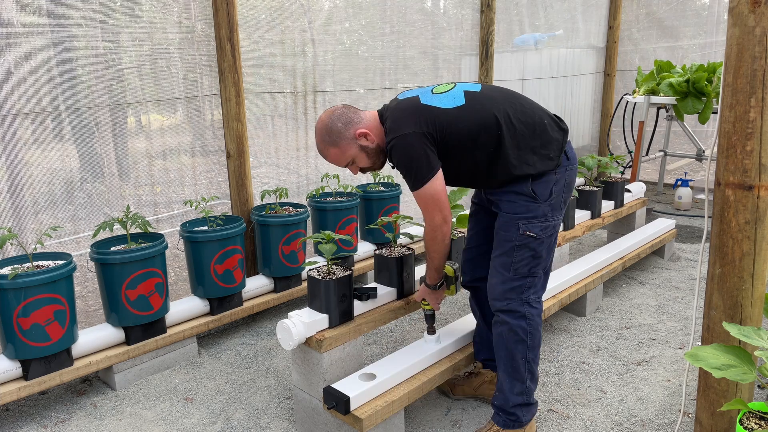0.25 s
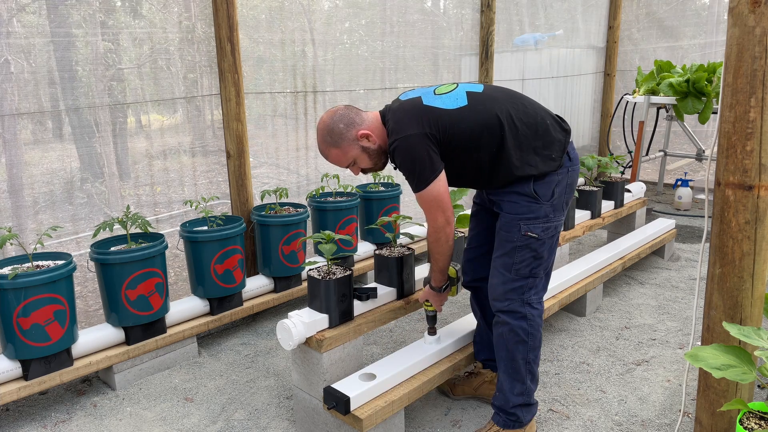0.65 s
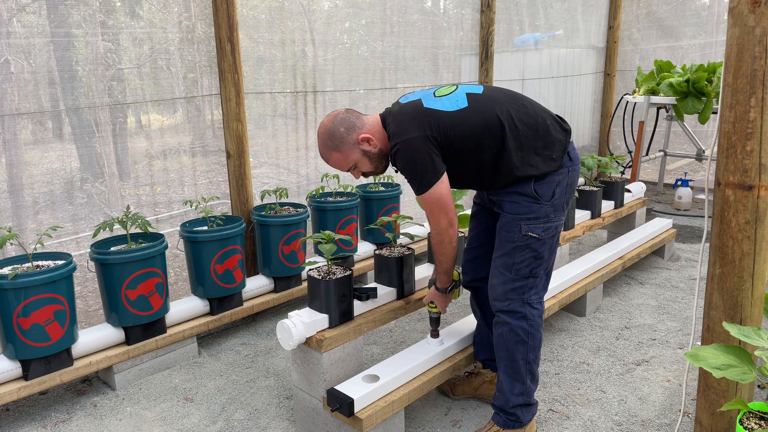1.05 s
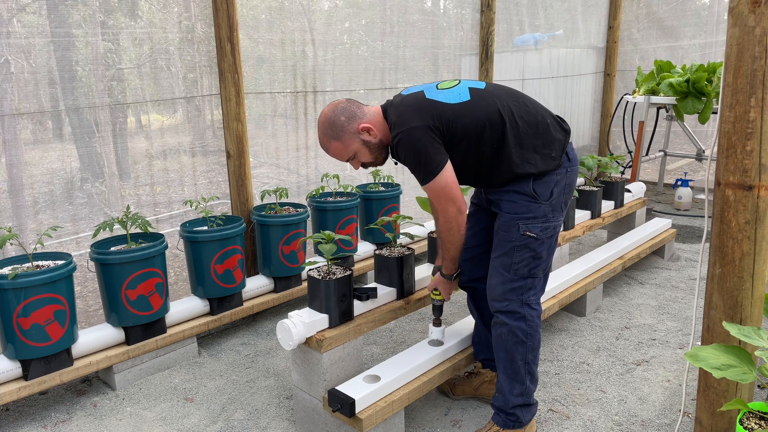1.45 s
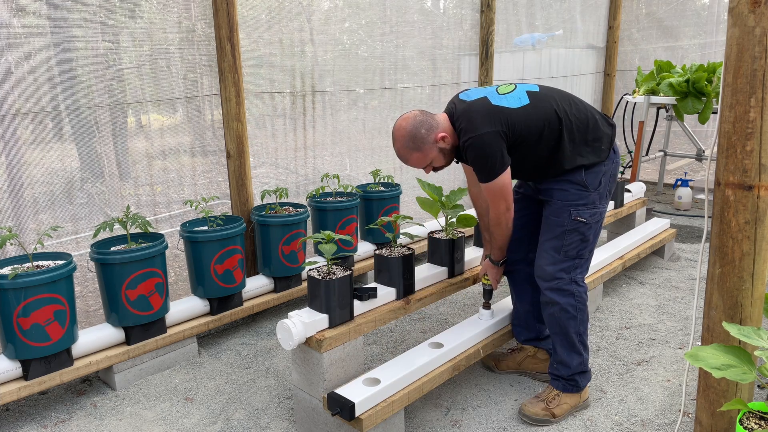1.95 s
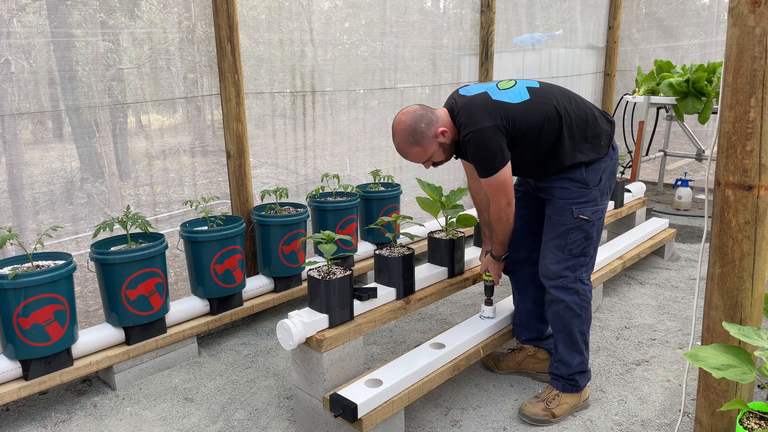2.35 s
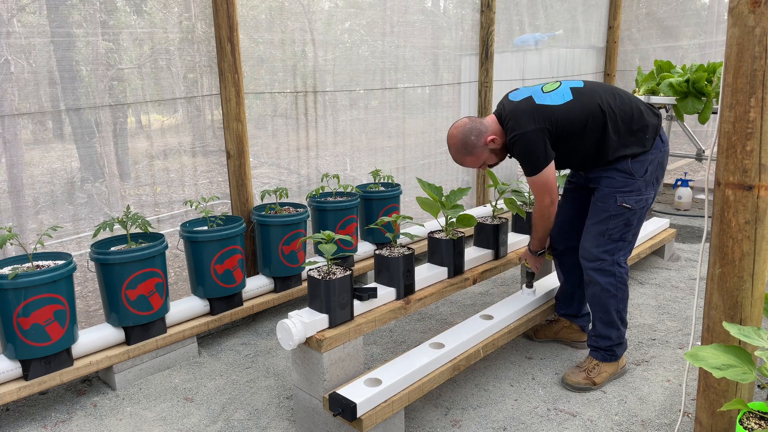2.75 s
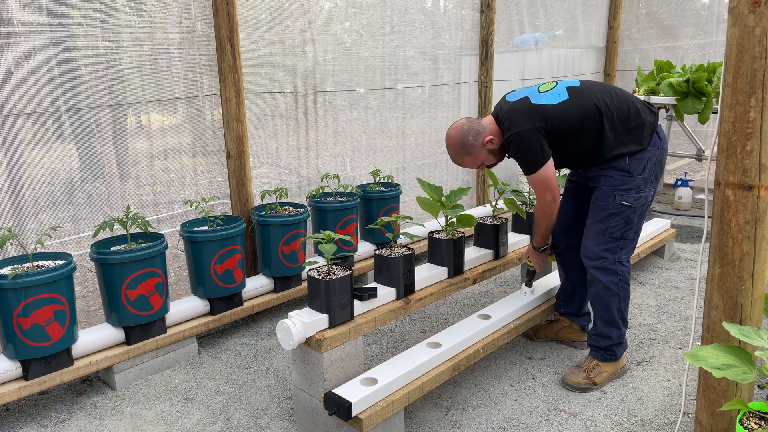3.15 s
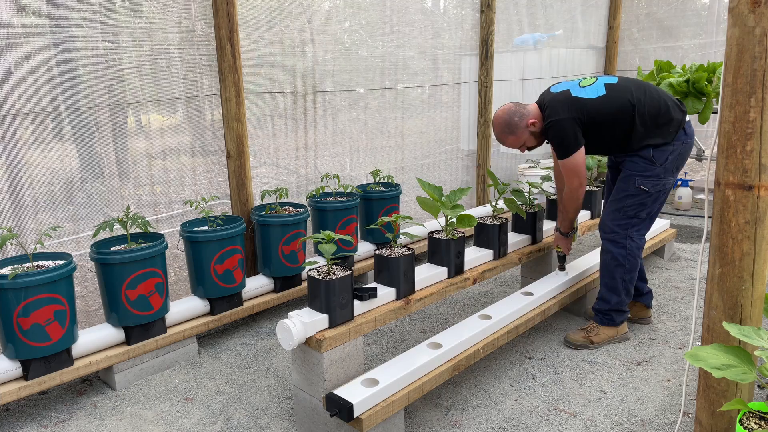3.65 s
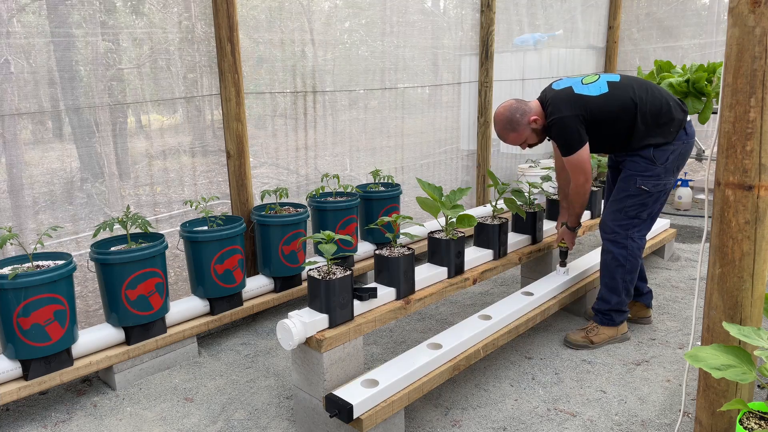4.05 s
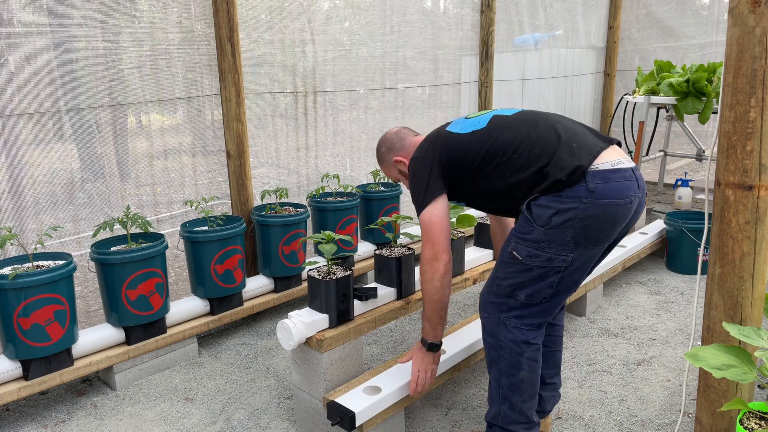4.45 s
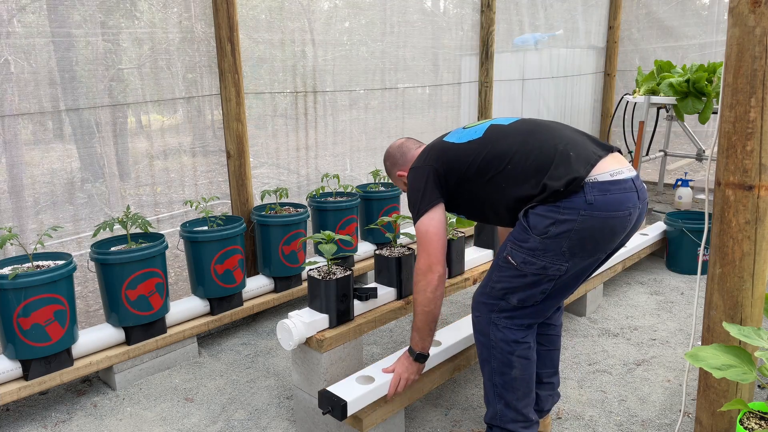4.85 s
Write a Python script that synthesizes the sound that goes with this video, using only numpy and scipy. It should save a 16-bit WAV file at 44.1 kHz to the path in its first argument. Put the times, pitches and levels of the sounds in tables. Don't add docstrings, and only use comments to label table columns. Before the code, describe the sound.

Four abruptly cut bursts of whirring drill and rattling plastic pipe, each spinning free and clacking to a stop, then quiet handling and faint birds.

```python
import sys
import numpy as np
from scipy import signal
from scipy.fft import rfft, irfft, next_fast_len
from scipy.io import wavfile
from scipy.ndimage import map_coordinates

SR = 44100
rng = np.random.default_rng(int(sys.argv[2]) if len(sys.argv) > 2 else 0)


def pcm_store(signal):
    levels = np.round(np.clip(np.atleast_2d(signal), -1, 1) * 32767)
    wavfile.write(sys.argv[1], SR, levels.astype(np.int16).T)


def level_to_linear(level):
    exponent = np.asarray(level, float) / 20
    return 10 ** exponent


N = 225351
TIME = np.arange(N) / SR

# start_s of each take, then the end
TAKES = [
    0,
    .1495,
    1.6155,
    2.5155,
    3.349,
    4.1155,
    5.2,
]
# through_s (saw breaks through), off_s (trigger let go), brake_s (brake bites)
RUNS = [
    (.878, 1.092, 1.402),
    (1.964, 2.142, 2.288),
    (2.82, 3.008, 3.128),
    (3.545, 3.708, 3.915),
]
# regular_share (0-1), wobble_phase_turns, wobble_on_pipe_db, wobble_on_grit_db
HOLES = [
    (0.52, 0.75, 3, 4),
    (0.74, 0.14, 0.5, -0.5),
    (0.83, 0.45, 1, 0.5),
    (0.53, 0.58, -0.5, 1),
]
# loaded_mesh_db, its side_tones_db, commutator_db, load_effect_on_commutator_db
TONES = [
    (-52, -9, -42, 3.5),
    (-36.5, -16, -45.5, 1),
    (-32, -11, -41, -3),
    (-34.5, -14, -39, 5),
]
# pitch_hz, width_hz
PIPE = [(135, 50), (213, 14), (268, 35), (333, 20), (375, 35), (470, 35), (540, 40), (610, 30), (700, 45),
        (775, 50), (915, 50), (1010, 70), (1200, 90), (1420, 120), (1740, 90)]
SAW_GEAR = 14.33
UNLOAD_S = .01
SURGE_DB, SURGE_RISE = 3.5, 20.6
LET_GO, STOP = 1800, 990


def unit(x):
    return x / np.sqrt(np.mean(x ** 2) + 1e-20)


def along(points, hz):
    f, v = np.transpose(points)
    return np.interp(np.log(hz + 1), np.log(f + 1), v)


def wobble(rate):
    step = 16
    knots = rng.standard_normal(int(N * rate / SR) + 4)
    return np.repeat(map_coordinates(knots, [TIME[::step] * rate]), step)[:N]


def filtered(x, response):
    m = next_fast_len(len(x) + SR // 4)
    return irfft(rfft(x, m) * response(np.fft.rfftfreq(m, 1 / SR)), m)[:len(x)]


def noise(spectrum, grain_db):
    grains = rng.standard_normal(N) * level_to_linear(grain_db * wobble(700))
    return unit(filtered(grains, lambda hz: level_to_linear(along(spectrum, hz))))


def stroke(t, s, held_s, rise, fall):
    before = np.clip(s - t, 0, .5)
    after = np.clip(t - s - abs(held_s), 0, .5)
    return level_to_linear(-abs(rise) * before - abs(fall) * after)


def dying(t, db, hz, t60):
    return level_to_linear(db - 60 * t / t60) * np.sin(2 * np.pi * hz * t)


def shed(x):
    # pitch_hz, t60_s
    echo_t60 = [
        (200, 0.18),
        (2000, 0.29),
        (12000, 0.12),
    ]
    hz, t, z = signal.stft(rng.standard_normal(SR // 2), SR, nperseg=256)
    tail = signal.istft(z * level_to_linear(-60 * t / along(echo_t60, hz)[:, None]), SR, nperseg=256)[1]
    tail = tail / np.linalg.norm(tail)
    cuts = [min(round(s * SR), N) for s in TAKES]
    return np.concatenate([signal.fftconvolve(x[a:b], tail)[:b - a] for a, b in zip(cuts, cuts[1:])])


def outdoor_air():
    # pitch_hz, level_db per Hz
    air_colour = [(12, -42), (20, -25), (79, -4), (184, 2), (237, -9.5), (521, -7.5), (652, -9.5),
                  (1790, -17.5), (3520, -14.5), (14700, -30.5), (16500, -46.5)]
    return level_to_linear(-63.5) * noise(air_colour, grain_db=1.2)


def far_engine():
    # pitch_hz, level_db
    hum_tones = [
        (64.6, -68.5),
        (96.9, -64.5),
        (129.2, -72),
        (185, -72.5),
        (295, -73),
    ]
    hum = sum(level_to_linear(db + 1.0 + 1.5 * wobble(3.7)) * np.sin(2 * np.pi * hz * TIME) for hz, db in hum_tones)
    return hum * np.clip(TIME - 3.7, .3, 1.1)


def birds():
    # start_s, end_s, start_hz, end_hz, level_db
    chirps = [(2.38, 2.42, 2980, 2900, -63), (2.446, 2.47, 4950, 5000, -65),
              (2.417, 2.449, 2850, 3700, -54), (3.27, 3.345, 2850, 2750, -61),
              (4.535, 4.57, 2850, 2950, -66), (4.545, 4.58, 3200, 3150, -65), (4.575, 4.6, 3200, 3750, -64),
              (4.578, 4.62, 4080, 4020, -65), (4.6, 4.63, 2980, 3000, -61), (4.625, 4.655, 3000, 3250, -62),
              (4.635, 4.665, 3450, 3650, -61), (4.66, 4.7, 3680, 3720, -62), (4.68, 4.712, 4100, 3750, -64),
              (4.715, 4.745, 3850, 3720, -66), (4.74, 4.765, 3780, 3980, -61),
              (4.775, 4.8, 3500, 3550, -67), (4.25, 4.33, 4200, 4250, -68), (4.36, 4.44, 4550, 4650, -71),
              (4.95, 5.04, 4450, 4350, -69), (5.02, 5.09, 4700, 4600, -70), (4.4, 4.56, 10500, 10200, -79),
              (4.8, 5.02, 10500, 10100, -78)]
    out, waver, flutter = np.zeros(N), wobble(150), wobble(70)
    for s0, s1, hz0, hz1, db in chirps:
        over_db = -30 + 1.5 * abs(np.log2(hz1 / hz0)) / (s1 - s0)
        part = slice(round(s0 * SR), round(s1 * SR))
        u = np.linspace(0, 1, part.stop - part.start)
        pitch = (hz0 + (hz1 - hz0) * u) * (1 + 50 / hz0 * waver[part])
        phase = 2 * np.pi * np.cumsum(pitch) / SR
        swell = level_to_linear(db + 2.2 * flutter[part]) * np.abs(np.sin(np.pi * u)) ** .5
        out[part] += swell * (np.sin(phase) + level_to_linear(over_db) * np.sin(2 * phase))
    return out + level_to_linear(-7) * shed(out)


def shuffling():
    # pitch_hz, level_db per Hz
    rustle_colour = [(530, -1.5), (900, 1.5), (1530, -14.5), (1810, -8.5), (3780, -9), (5780, -20.5),
                     (6640, -18), (14000, -29)]
    # start_s, level_db, held_s, dying_db_per_s
    scuffs = [(1.48, -59.5, 0.075, 170), (2.36, -43, 0, 330), (2.438, -66, 0.22, 900),
              (3.17, -41.5, 0, 200), (3.278, -64, 0.089, 128), (3.94, -44.5, 0.016, 303),
              (4.014, -59.5, 0.12, 502), (4.119, -44.5, 0.014, 498), (4.173, -39.5, 0.016, 499),
              (4.22, -53, 0.033, 38), (4.56, -57.5, .195, 899.5)]
    take = np.searchsorted(TAKES, TIME, "right")
    level = np.zeros(N)
    for s, db, held_s, fall in scuffs:
        level += level_to_linear(db) * stroke(TIME, s, held_s, 850, fall) * (take == take[round(s * SR)])
    return level * level_to_linear(-2.5) * noise(rustle_colour, grain_db=3)


def bench():
    # start_s, peak_db
    thumps = [
        (1.958, -36),
        (2.239, -43),
        (2.295, -52),
        (2.817, -38),
        (3.531, -46),
    ]
    # pitch_hz, level_db, t60_s
    planks = [
        (102, 0, 0.14),
        (136, -2.5, 0.22),
    ]
    out, t = np.zeros(N + SR), np.arange(SR // 4) / SR
    for s, db in thumps:
        sway = sum(dying(t, db + level, hz, t60) for hz, level, t60 in planks)
        out[round(s * SR):][:len(t)] += (1 - np.exp(-t / 0.0092)) * sway
    return out[:N]


def chuck_and_spring():
    # pitch_hz, level_db, t60_s
    chuck_tones = [
        (980, -1, 0.023),
        (1235, -17, 0.14),
        (1826, 6.5, 0.028),
        (3500, -17, 0.036),
        (4900, -33, .15),
    ]
    # start_s, level_db, brightness_db per octave
    taps = [
        (.0002, -33, 3.5),
        (0.0921, -30, -26),
    ]
    # start_s, level_db
    twangs = [
        (2.319, -33),
        (3.15, -36),
        (3.924, -36),
    ]
    out, t = np.zeros(N), np.arange(SR // 4) / SR
    for s, db, tilt_db in taps:
        out[round(s * SR):][:len(t)] += sum(dying(t, db + level + tilt_db * np.log2(hz / 930), hz, t60)
                                            for hz, level, t60 in chuck_tones)
    for s, db in twangs:
        out[round(s * SR):][:len(t)] += dying(t, db, 4200, .09)
    return out


def clacks():
    # start_s, peak_db, top_over_middle_db, steel_ring_db
    contacts = [(0.0002, -14.5, -8.5, -17), (0.09, -46.5, -9, -14), (1.252, -25, -6, -25),
                (1.3935, -31, 0, -23), (1.4042, -22.5, -10, -24), (1.414, -26, -7, -16),
                (1.4177, -13.5, -14, -18), (1.4225, -16, 0.5, -15), (1.4452, -23, 0.5, -9),
                (1.4566, -31, -4, -7), (1.464, -31.5, -8, -20), (1.473, -30.5, -20, -16),
                (1.494, -53, -8, 4), (2.294, -20, 3, -17), (2.3077, -31, -6, -20), (2.312, -22, 0, -19),
                (2.3148, -20, -9, -20), (2.3184, -16.5, -2, -8.5), (2.3508, -32, 4.5, -11),
                (2.357, -43, -5, -18), (2.387, -44, -12, -14.5), (2.51, -31.5, -25, -6),
                (3.1317, -23, 3, -20), (3.1341, -10, 3, -22), (3.1362, -12.5, 3, -23),
                (3.143, -29, -3, -20), (3.1495, -23.5, -2, -12), (3.1508, -16.5, -1, -11),
                (3.161, -32, -7, -8), (3.283, -40.5, -6, -21), (3.646, -33, -10, -25),
                (3.906, -38, -3, -19), (3.919, -27.5, -8, -19), (3.923, -18.5, -9, -14),
                (3.958, -43, -6, -23), (3.968, -40, -5.5, -24), (3.984, -46, -3, -16),
                (4.0123, -38, -11, -17), (4.023, -40, -13, -14), (4.17, -32, -33, -17),
                (4.1994, -42, -14, -14), (4.27, -51, -20, -14), (4.347, -50, -22, -10),
                (4.55, -52, -22, -14), (4.934, -50, -22, -14)]
    # pitch_hz, level_db, t60_s
    steel_tones = [
        (2400, -16, .04),
        (4080, -11, .04),
        (4750, -16, .05),
        (7650, -11, .06),
        (11780, -14, .07),
        (12390, .1, .04),
        (13160, -3.5, .047),
        (14200, -5, .045),
        (14640, -5, .03),
    ]
    # pitch_hz, width_hz, level_db
    jaw_tones = [
        (2570, 830, -8),
        (4660, 600, -8),
        (7870, 250, 1.5),
        (9480, 950, 0.5),
        (12300, 360, -6.5),
        (14700, 800, -7.5),
    ]
    middle, top, steel = np.zeros((3, N + SR))
    t = np.arange(SR // 4) / SR
    ragged_db = np.pad(4 * wobble(350), (0, SR))
    for s, db, top_db, ring_db in contacts:
        part = slice(round(s * SR), round(s * SR) + len(t))
        crack = level_to_linear(-60 * t / 0.0075)
        rattle = 0.13 * level_to_linear(ragged_db[part] - 60 * t / 0.066)
        fade = (crack + rattle) * (1 - np.exp(-t / 0.00032))
        ring = sum(dying(t, level + rng.normal(0, 2.2), hz, t60) for hz, level, t60 in steel_tones)
        middle[part] += level_to_linear(db + 4.0) * fade * rng.standard_normal(len(t))
        top[part] += level_to_linear(db + top_db) * 0.86 * fade * rng.standard_normal(len(t))
        steel[part] += level_to_linear(db + top_db + ring_db) * ring * (1 - np.exp(-t / .001))
    low = signal.sosfilt(signal.butter(2, [1400, 5500], "band", fs=SR, output="sos"), middle[:N])
    high = signal.butter(1, 3500, "high", fs=SR, output="sos")

    def jaws(f):
        ringing = sum(level_to_linear(db) * 1j * f * w / (hz * hz - f * f + 1j * f * w) for hz, w, db in jaw_tones)
        return 1.56 * (0.59 + ringing)

    cracks = filtered(low + signal.sosfilt(high, top[:N]), jaws)
    return chuck_and_spring() + signal.sosfilt(high, steel[:N]) + cracks


def shaft():
    speeds = [
        (292, 281, 301.8),
        (282, 281, 299.5),
        (273, 272.5, 297.3),
        (275, 274, 291.7),
    ]
    speed = np.zeros(N)
    for cut, (through, off, _), (cutting, bogged, free) in zip([0] + TAKES[2:], RUNS, speeds):
        eased = through - UNLOAD_S
        loaded = cutting + (bogged - cutting) * np.clip((TIME - cut) / (eased - cut), 0, 1) ** 2
        run_up = (free - bogged) * (1 - np.exp(-np.clip(TIME - eased, 0, None) / .046))
        coast = 320 * np.clip(TIME - off, 0, .4)
        speed = np.where(TIME >= cut, loaded + run_up - coast, speed)
    return speed


def power(hole):
    cut, (through, _, brake) = TAKES[hole + 1], RUNS[hole]
    on = stroke(TIME, cut, brake - .01 - cut, 0, 4 * STOP) * (TIME >= cut)
    return on, stroke(TIME, cut, through - cut, 0, LET_GO)


def saw_lean(turns, hole):
    start = turns[round(TAKES[hole + 1] * SR)]
    return np.cos(2 * np.pi * ((turns - start) / SAW_GEAR - HOLES[hole][1]))


def motor_hiss(speed, turns):
    # pitch_hz, level_db per Hz
    hiss_colour = [(590, -12.5), (1000, -2), (1330, 2), (1680, -7), (2330, 4.5), (3510, 0), (3990, -0.5),
                   (6930, 1), (7520, -5), (9070, -6.5), (15200, -10.5), (15900, -21), (16500, -55)]
    # pitch_hz, width_hz, level_db
    shell_tones = [
        (2270, 460, -1),
        (3960, 298, -2.5),
        (5570, 400, -2.5),
        (4780, 87, 4.5),
        (7570, 380, 3.5),
        (11100, 680, 1),
        (13060, 1400, -2.5),
        (14950, 500, 5.5),
    ]
    hiss = noise(hiss_colour, grain_db=1.0)
    hiss = unit(filtered(hiss, lambda f: level_to_linear(sum(db / (1 + (2 * (f - hz) / width) ** 2)
                                                 for hz, width, db in shell_tones))))
    top = filtered(hiss, lambda f: 1 / (1 + (8600 / (f + 1)) ** 8))
    top_keeps = level_to_linear(-8.5 * np.log2(speed / 300))
    return (hiss - top + top * top_keeps) * level_to_linear(1.3 * np.cos(2 * np.pi * turns))


def teeth_grit():
    # pitch_hz, level_db per Hz
    grit_colour = [(880, -19.5), (1500, -13), (2450, -3.5), (2800, 0), (3120, 0.5), (3500, -4.5),
                   (3930, -16.5), (5810, -18), (8170, -16.5), (9990, -15), (15400, -45), (16000, -13),
                   (16500, -61)]
    grit = noise(grit_colour, grain_db=3.0)
    grit = filtered(grit, lambda f: level_to_linear(5 / (1 + ((f - 8600) / 700) ** 2)))
    sizzle = unit(filtered(grit, lambda f: np.exp(-((f - 7750) / 690) ** 2)))
    return grit, sizzle


def hiss_and_grit(speed, turns):
    # hiss_db, cutting_grit_db, free_grit_db, rim_sizzle_over_hiss_db
    rush_levels = [
        (-36, -39.5, -62, -40),
        (-36.5, -37, -37.5, -7),
        (-36, -29.5, -33.5, -9),
        (-36, -35.5, -33.5, -10),
    ]
    hiss, (grit, sizzle) = motor_hiss(speed, turns), teeth_grit()
    out = np.zeros(N)
    for hole, (hiss_db, grit_db, free_db, sizzle_db) in enumerate(rush_levels):
        cut, (through, _, brake) = TAKES[hole + 1], RUNS[hole]
        running = stroke(TIME, cut, brake - cut, 0, STOP) * (TIME >= cut)
        cutting = power(hole)[1]
        braking = 1 + (level_to_linear(5) - 1) * stroke(TIME, brake, 1, 810, 0)
        surge = 1 + (level_to_linear(SURGE_DB) - 1) * stroke(TIME, through, 1, SURGE_RISE, 0)
        fan = level_to_linear(hiss_db + 14.5 * np.log2(speed / 300) + 3.5 * cutting) * braking
        free_grit = level_to_linear(free_db) * (1 - cutting) * stroke(TIME, through, 0, 0, 27) * braking
        load = level_to_linear(grit_db) * cutting * surge + free_grit
        out += running * fan * (hiss + level_to_linear(sizzle_db) * sizzle)
        out += level_to_linear(HOLES[hole][3] * saw_lean(turns, hole) - 4.5) * running * load * grit
    return out


def tone(turns, order, rough_db):
    return level_to_linear(rough_db * wobble(25.07)) * np.sin(2 * np.pi * (order * turns + rng.random()))


def gear_whine(speed, turns):
    whine_orders = [4, 5, 15, 16, 17, 20, 21, 22, 23, 25, 26, 27, 30, 31, 32, 35, 36, 37, 40, 45, 50]
    free_strengths = [-9, -5.5, -1.5, -8, -6, -2, -5, -2, -7, -4, -1.5, -11, -4, -9, -8, -8, -8, -12, -10,
                      -14, -10]
    loaded_strengths = [-12, -4, -1, -12, -16, -9, -13, -10, -16, -7, -3, -18, -7, -14, -14, -13, -13, -16,
                        -12, -16, -16]
    # cutting_db, free_db, orders_from_30_up_db
    whine_levels = [
        (-44, -46, 0),
        (-52, -45, -4),
        (-52, -47, -4),
        (-50, -45, -5),
    ]
    # pitch_hz, half_width_hz, lift_db
    shell_lift = (7500, 380, 6)
    lift_hz, lift_width, lift_db = shell_lift
    lines = []
    for order in whine_orders:
        fade = (speed / 300) ** (.2 * order)
        lift = level_to_linear(lift_db / (1 + ((order * speed - lift_hz) / lift_width) ** 2))
        lines.append(fade * lift * tone(turns, order, 2.2))
    lines = np.array(lines)
    laden = level_to_linear(loaded_strengths) @ lines
    low, shrill = level_to_linear(free_strengths[:12]) @ lines[:12], level_to_linear(free_strengths[12:]) @ lines[12:]
    out = np.zeros(N)
    for hole, (cut_gain, free_gain, shrill_gain) in enumerate(level_to_linear(whine_levels)):
        on, busy = power(hole)
        out += on * (cut_gain * busy * laden + free_gain * (1 - busy) * (low + shrill_gain * shrill))
    return out


def commutator(speed, turns):
    # pitch_hz, depth_db, width_hz
    echo_dips = [
        (2960, -22, 80),
        (3560, -4, 80),
        (3500, -6, 60),
        (3240, -14, 90),
    ]
    bars, out = tone(turns, 12, 1.4), np.zeros(N)
    for hole, (null_hz, null_db, width) in enumerate(echo_dips):
        on, busy = power(hole)
        bars_db, load_db = TONES[hole][2:]
        dip_db = null_db / (1 + ((12 * speed - null_hz) / width) ** 4)
        out += on * level_to_linear(bars_db + load_db * busy + dip_db) * bars
    return out


def gear_mesh(turns):
    # pitch_swing_radians, level_swing_db
    mesh_swings = [
        (1, 3),
        (.4, 0),
        (2, 5),
        (.4, 1),
    ]
    order, out = 11.26, np.zeros(N)
    side = tone(turns, order - 1, 4) + .4 * tone(turns, order + 1.5, 4)
    for hole, (swing, sway_db) in enumerate(mesh_swings):
        lean, (mesh_db, side_db) = saw_lean(turns, hole), TONES[hole][:2]
        mesh = level_to_linear(wobble(25)) * np.sin(2 * np.pi * order * turns + swing * lean)
        loaded = (TIME > TAKES[hole + 1]) * (TIME < RUNS[hole][0] + UNLOAD_S)
        out += level_to_linear(mesh_db + sway_db * lean) * (mesh + level_to_linear(side_db) * side) * loaded
    return out


def drill(speed, turns):
    return hiss_and_grit(speed, turns) + gear_whine(speed, turns) + commutator(speed, turns) + gear_mesh(turns)


def saw_teeth(bite_db, uneven_db):
    size = level_to_linear(np.full(1025, uneven_db))
    size[::4] = 1
    size[12:52:4] = level_to_linear(bite_db)
    return unit(irfft(size * np.exp(2j * np.pi * rng.random(len(size)))))


def saw_force(turns):
    bite_strengths = [
        (5.5, -3.5, -2, 3.5, -14.5, 0.5, 5.5, 3.5, -4, 5),
        (-13.5, -7, 4, 2.5, -3, 4.5, 6, 0.5, -1, -6.5),
        (-6.5, 0.5, -5.5, -1, 7, -5, -4, -1.5, 1, -11.5),
        (1, 1.5, 5.5, -10, 0.5, -3.5, 4, -10.5, -5.5, -8.5),
    ]
    uneven_teeth = [
        -8.5,
        -5.5,
        -11,
        -5.5,
    ]
    force = unit(rng.standard_normal(N) * level_to_linear(0.85 * wobble(45)))
    for hole, bite in enumerate(zip(bite_strengths, uneven_teeth)):
        regular, _, pipe_db, _ = HOLES[hole]
        near, far = saw_teeth(*bite), saw_teeth(*bite)
        rock = .6 * wobble(8)
        place = (turns / SAW_GEAR + .003 * wobble(30)) % 1
        tooth = (place * len(near)).astype(int)
        bites = np.cos(rock) * near[tooth] + np.sin(rock) * far[tooth]
        mix = np.sqrt(regular) * bites + np.sqrt(1 - regular) * force
        cutting = level_to_linear(pipe_db * saw_lean(turns, hole)) * mix
        force = np.where((TIME > TAKES[hole + 1] - .06) & (TIME < RUNS[hole][0]), unit(cutting), force)
    return force


def pipe_levels(t, take):
    # cutting_db, deep_over_it_db, growth_db_per_s, free_rubbing_db, deep_over_rubbing_db
    presses = [
        (-27.5, -4, -15, -36, 3.5),
        (-25, -1, -0.5, -30.5, 3.5),
        (-21, 2.5, -20.5, -31, 0),
        (-32.5, -7, 26, -34, 2.5),
    ]
    # start_s, level_db, deep_over_it_db, held_s, dying_db_per_s
    rubs = [(0, -38.5, -6, 0.012, 404), (.094, -47.5, -5, 0.022, 500), (.992, -42, -1, 0.0029, 154),
            (1.25, -34.5, 3, 0, 350), (1.421, -38.5, -3.5, 0, 359), (2.238, -20, -1.5, 0.013, 254),
            (2.289, -37, 13, 0, 312), (3.136, -20, -7.5, 0, 500), (3.219, -33.5, 0.5, 0, 341),
            (3.924, -57, 11, 0.044, 300), (4.02, -44.5, -17, 0, 495), (4.116, -40.5, -20, 0.04, 500),
            (4.184, -36.5, -14, 0.018, 600), (4.22, -49, -22, 0, 122), (4.633, -58, 13.5, 0.14, 400),
            (4.867, -61, 10, 0.039, 189.5)]
    deep_growth = [
        -1,
        30,
        21,
        -27,
    ]
    deep_early = [
        0,
        0,
        .04,
        0,
    ]
    deep, wall = np.zeros((2, len(t))) + 1e-4
    for s, db, deep_db, held_s, fall in rubs:
        if TAKES[take] - .01 <= s < TAKES[take + 1]:
            rub = level_to_linear(db) * stroke(t, s, held_s, 750, fall)
            deep, wall = np.hypot(deep, level_to_linear(deep_db) * rub), np.hypot(wall, rub)
    if 0 < take <= len(RUNS):
        hole = take - 1
        through, _, brake = RUNS[hole]
        db, deep_db, growth, free_db, free_deep_db = presses[hole]
        pressed = level_to_linear(db + growth * (np.minimum(t, through) - TAKES[take]))
        cutting = pressed * stroke(t, through, 0, 0, LET_GO)
        shaking = pressed * stroke(t, through - deep_early[hole], 0, 0, 330)
        free = level_to_linear(free_db) * stroke(t, through, 0, 0, 45.2) * stroke(t, brake, 0, 0, STOP)
        surge = 1 + (level_to_linear(SURGE_DB) - 1) * stroke(t, through, 1, SURGE_RISE, 0)
        sink_db = deep_growth[hole] * (t - (through + TAKES[take]) / 2)
        deep_cut = level_to_linear(deep_db + sink_db) * shaking * surge ** 0.33
        deep = np.hypot(deep, np.hypot(deep_cut, level_to_linear(free_deep_db) * free))
        wall = np.hypot(wall, np.hypot(cutting * surge, free))
    return deep, wall


def pipe(blows, hold, modes):
    stirred = [
        (-23, -6.5, -7.5, 1.2, -3, 0.5, -3.5, 3.5, -0.5, -1, -7.5, -12, -16, -14, -14),
        (-105, -3, -12.5, 1.5, -4, -2.5, -5, 3, 0.5, -2, -3.5, -13, -16.5, -23.5, -13.5),
        (-21, -7, -5, 1.8, -3, -4.5, -8, 4, -2, -1.5, -7.5, -15.5, -14, -15.5, -27.5),
        (-18.5, -8.5, -9.5, 1.5, -5.5, -5, -8, 0, -7, -6.5, -9, -12.5, -17, -16.5, -22),
        (-13.5, -9, -6.5, 0, -0.5, -5.5, -3.5, -0.5, -5.5, -5, -7.5, -9.5, -9.5, -12, -14),
    ]
    up = 1.092 if hold == len(stirred) - 1 else 1

    def response(f):
        ringing = 0
        for k in modes:
            hz, width = PIPE[k]
            ringing = ringing + ((-1) ** k * level_to_linear(stirred[hold][k]) * 1j * f * width
                                 / ((up * hz) ** 2 - f * f + 1j * f * width))
        return ringing * f ** 4 / (f ** 4 + 140 ** 4) / (1 + (f / 1700) ** 4)

    return filtered(blows, response)


def drumming(force):
    # start_s, peak_db, deep_over_wall_db
    knocks = [(0.091, -43, 0), (0.835, -8.5, -12), (0.85, -16, -6), (0.865, -10, -4), (0.879, -14, 1),
              (1.244, -17, 0), (1.252, -17, -4), (1.627, -5, -10), (1.872, -13, 0), (1.922, -4.5, -3),
              (1.957, 1, -2), (1.965, -6, 0), (2.235, -0.5, -3), (2.261, -19, 2), (2.278, -9, -11),
              (2.478, -32.5, 10), (2.525, -14, 6), (2.539, -7, 3), (2.661, -5, 6), (2.679, -4, 6),
              (2.716, -2.5, 2.5), (2.818, 1.5, -8), (3.133, -15, -6), (3.211, -14.5, -6), (3.217, -20, -12),
              (3.228, -27, -6), (3.488, -6, -6), (3.525, -16, -11), (3.541, -17, -6), (3.645, -14, -9),
              (3.921, -26.5, 10), (3.967, -33, 13), (4.008, -41, 12), (4.156, -33, 0), (4.1693, -17.5, 0.5),
              (4.186, -35, 5), (4.197, -25, 0), (4.234, -39, 3), (4.48, -37, 1), (4.646, -36, 3),
              (4.676, -33, 0), (4.864, -36.5, 2)]
    push = np.hanning(24)
    blows, out, early = np.zeros((2, N)), np.zeros(N), SR // 20
    for s, db, deep_db in knocks:
        blows[:, round(s * SR):][:, :len(push)] = level_to_linear([[db + deep_db + 7], [db + 8]]) * push
    groups = range(5), range(5, len(PIPE))
    for take in range(len(TAKES) - 1):
        a, b = round(TAKES[take] * SR), min(round(TAKES[take + 1] * SR), N)
        part, hold = slice(max(a - early, 0), b), max(take - 1, 0)
        for level, blow, modes in zip(pipe_levels(TIME[part], take), blows, groups):
            scale = np.std(pipe(force[part], hold, modes))
            drive = level_to_linear(-2.5) * level * force[part] / scale + blow[part]
            out[a:b] += pipe(drive, hold, modes)[a - b:]
    return out


def scene():
    fade_in = [
        .001,
        .003,
        .0007,
        .006,
        .0015,
        .001,
    ]
    speed = shaft()
    turns = np.cumsum(speed * (1 + .0015 * wobble(30))) / SR
    motor, hits = drill(speed, turns), clacks()
    steady = outdoor_air() + far_engine() + birds() + shuffling() + bench()
    steady += motor + drumming(saw_force(turns))
    steady += level_to_linear(-30) * shed(motor) + level_to_linear(-19.5) * shed(hits)
    take = np.searchsorted(TAKES, TIME, "right") - 1
    steady *= np.clip(.05 + (TIME - np.take(TAKES, take)) / np.take(fade_in, take), 0, 1)
    steady = filtered(steady, lambda hz: np.clip((15950 - hz) / 250, 0, 1))
    hits = filtered(hits, lambda hz: np.clip((16450 - hz) / 900, 0, 1))
    return (steady + hits)[None]


def top_cut(x):
    return signal.sosfilt(signal.butter(12, 16660, fs=SR, output="sos"), x)


def record(dry):
    return top_cut(dry)


dry = scene()
out = record(dry)
pcm_store(out)
```